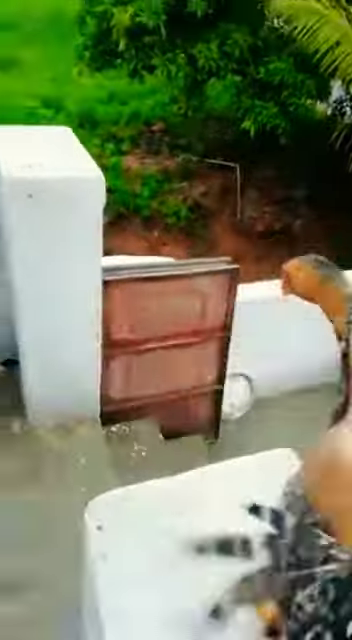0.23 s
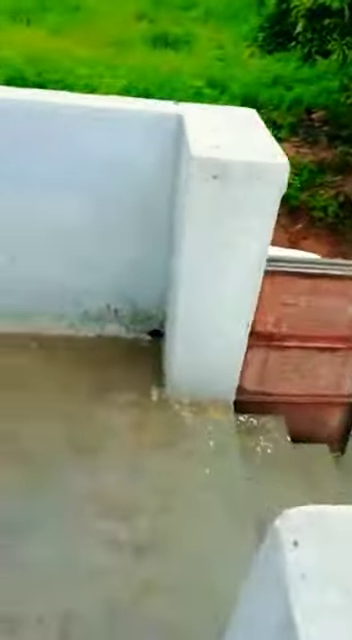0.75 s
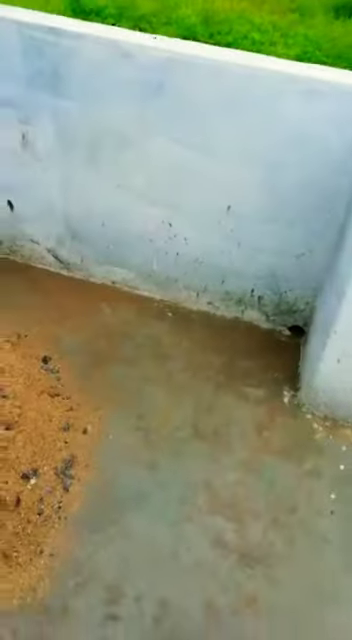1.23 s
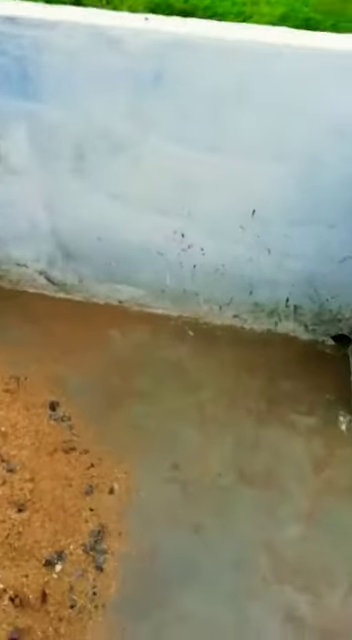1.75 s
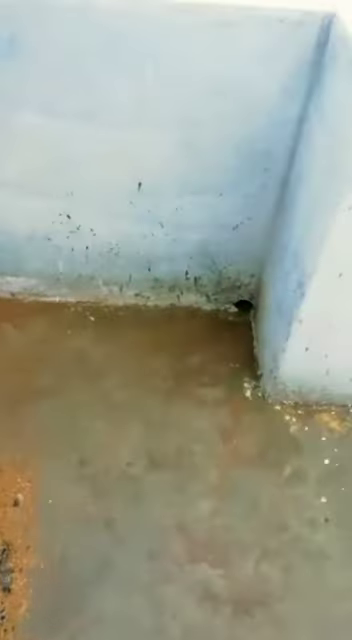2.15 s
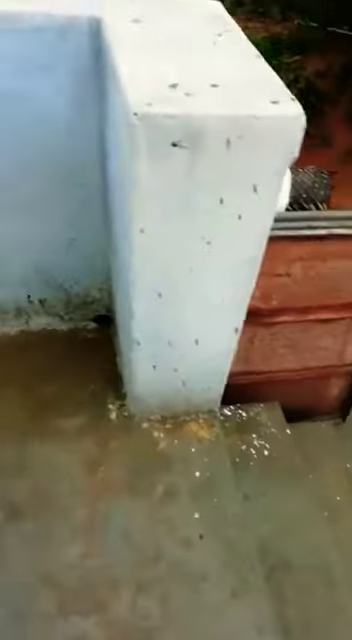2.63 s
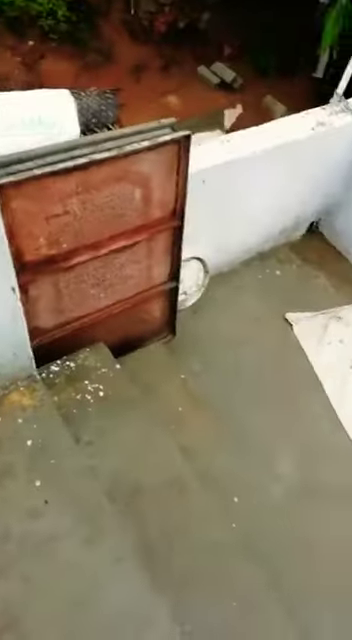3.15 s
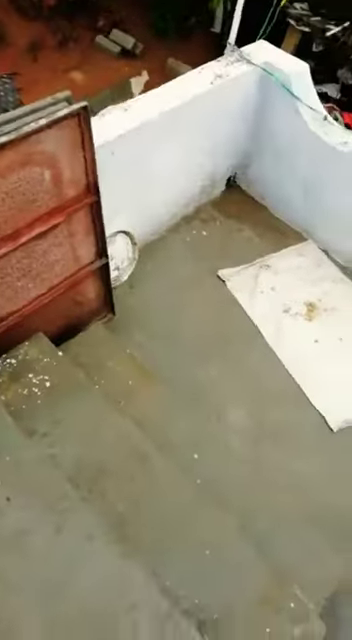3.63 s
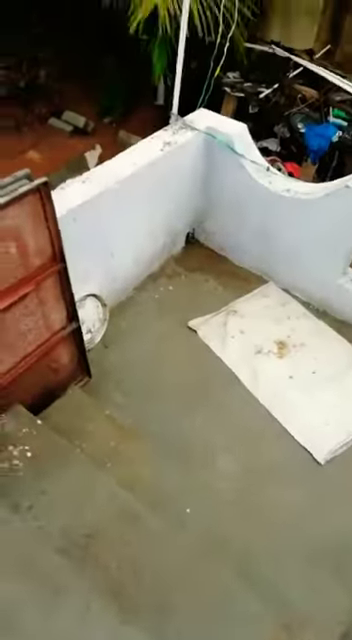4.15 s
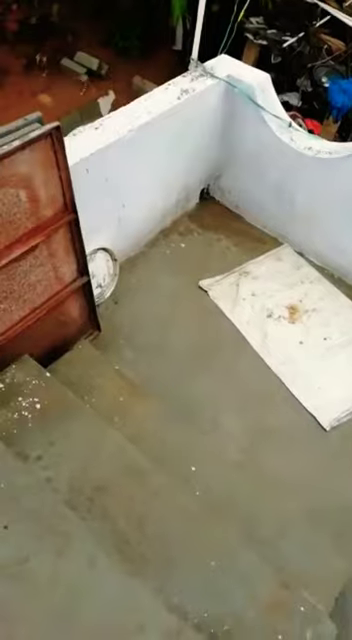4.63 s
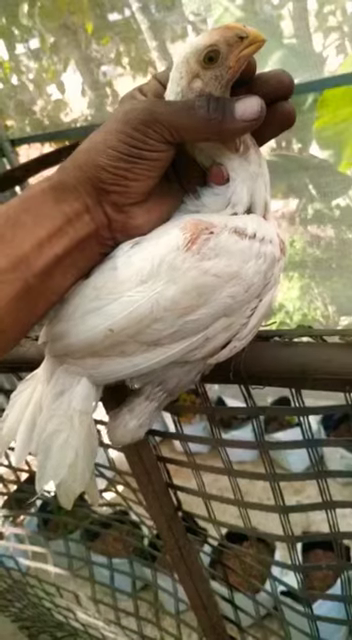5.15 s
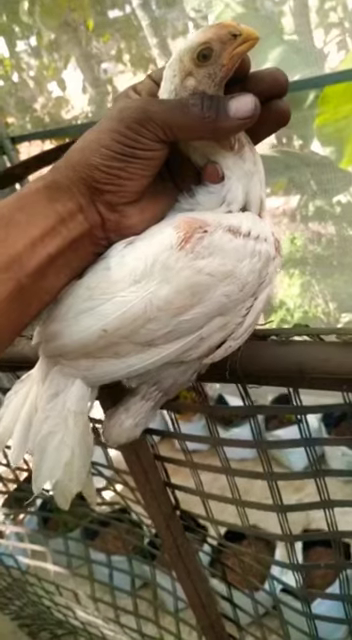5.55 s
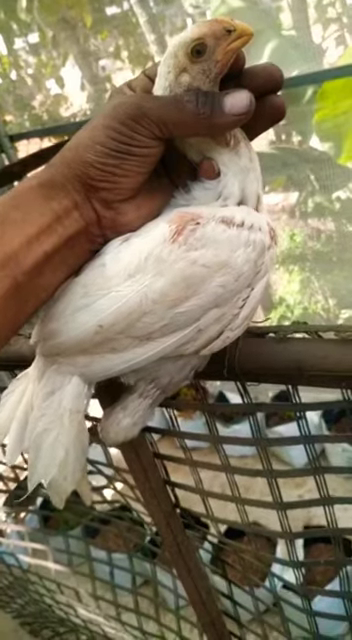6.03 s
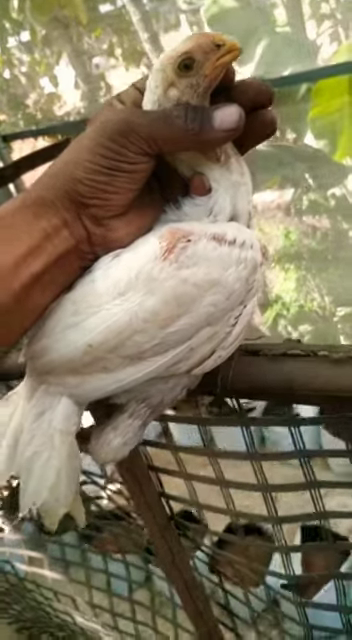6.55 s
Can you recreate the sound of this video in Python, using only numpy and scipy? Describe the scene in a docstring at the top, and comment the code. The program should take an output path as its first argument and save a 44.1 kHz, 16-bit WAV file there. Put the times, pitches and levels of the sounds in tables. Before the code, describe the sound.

Close to the microphone, a young hen gives short, rasping squawks that flutter rapidly between a low voice and a thin high one, with wing rustles and soft air thumps. The calls grow longer and harsher, then thin to single clucks on a quiet walled terrace. A sudden cut brings a low-humming coop, a light wire knock, faint far birds and three whistled chick peeps.

```python
"""Hen on a terrace, chick in a coop

A young hen squawks on a walled terrace: her voice flips about 48 times a second between a low register and a
thin high one, rasps at the breaks and ends in single clucks. Registers are gliding partials, rasp is irregular
clicks plus a lurching tone; feathers, air puffs and backgrounds are coloured noise, far birds are gliding tones.
After a short silence comes a coop: a low hum of wavering tones, a knock, far birds, three whistled chick peeps."""
import sys
import numpy as np
from scipy import signal
from scipy.fft import rfft, irfft, next_fast_len
from scipy.io import wavfile
from scipy.ndimage import uniform_filter1d, minimum_filter1d

SR = 44100
rng = np.random.default_rng(int(sys.argv[2]) if len(sys.argv) > 2 else 0)


def transcribe(u):
    """Save the signal u as a 16-bit wav file named by the first command-line argument.

    u: samples, shape (n,) or (channels, n), limited to [-1, 1]; the rate is SR.
    q: integer samples, one column per channel.
    """
    v = np.clip(np.atleast_2d(u).T, -1, 1)
    q = np.round(v * 32767).astype(np.int16)
    wavfile.write(sys.argv[1], SR, q)


N = 299439
TIME_S = np.arange(N) / SR
TERRACE_END_S, COOP_START_S, KNOCK_S = 4.72, 4.735, 4.895
CUTOFF_HZ = 15800

# Hen position: (time [s], left-right level [dB], lead of left port [ms])
HEN_PLACE = [(0, 4.5, 0.076), (.42, -0.5, 0.11), (1.0, 0.5, 0.061), (1.26, 0, 0.082), (1.95, 1, -0.028),
             (2.33, 2.5, -0.12), (2.62, -0.5, -0.19), (2.9, 1, -.12), (3.15, 0.5, -0.044),
             (3.43, -1, -0.043), (3.65, -2, -0.067), (4.3, 2, -0.07)]
# Port difference, left over right: (frequency [Hz], level [dB])
PORT_DIFFERENCE = [(200, -1), (750, -15.5), (1400, -1), (2000, -5.5), (2600, -1), (3300, -8), (4300, -14),
                   (5300, -13.5), (6600, -23), (8000, -18.5), (10000, -8.5), (12000, 4.5), (15000, 4)]
# Throat and beak resonances: (frequency [Hz], level [dB])
THROAT_COLOUR = [(3000, -6.5), (3800, 4.5), (4550, -13.5), (5300, 2), (6300, -1), (7300, -7), (8000, -13),
                 (9000, -22), (10200, -6.5), (11500, -21), (13000, -21.5), (16000, -35)]
# Rasp spectrum: (frequency [Hz], level [dB])
RASP_COLOUR = [(250, -26.5), (420, -17), (600, -20), (800, -12), (950, -17.5), (1250, -7), (1800, 3),
               (2200, -1), (2650, -3), (3200, -13), (3900, -3), (4500, -29.5), (5500, -40)]
# Deep cluck spectrum: (frequency [Hz], level [dB])
CHEST_COLOUR = [(280, -8.5), (450, -18), (700, -2.5), (950, 4.5), (1350, 2.5), (1800, -17.5), (2250, -9),
                (3000, -31)]
# Feather spectrum: (frequency [Hz], level [dB])
FEATHER_COLOUR = [(500, -17.5), (1500, -8), (3000, 3.5), (4500, -2.5), (6300, 7.5), (8000, -8.5),
                  (10000, -9.5), (15000, -8)]
# Puff spectrum: (frequency [Hz], level [dB])
PUFF_COLOUR = [(12, -33), (20, 0.5), (35, 2.5), (58, -6.5), (108, -20), (173, -22), (500, -28.5),
               (650, -60.5), (1100, -120)]
# Terrace air, spectrum shape: (frequency [Hz], level [dB])
TERRACE_COLOUR = [(15, -50), (25, -1), (108, -6.5), (309, -15), (503, -27), (796, -23), (988, -25.5),
                  (1560, -23), (1700, -27), (3920, -28.5), (4490, -33), (5730, -20), (7920, -35),
                  (14800, -30), (16000, -47)]
# Narrow hiss on the terrace, spectrum shape: (frequency [Hz], level [dB])
HISS_COLOUR = [(4600, -34), (5400, 1), (5700, -1), (6200, -10.5), (6800, -1), (7600, -34)]
# Coop air, spectrum shape: (frequency [Hz], level [dB])
COOP_COLOUR = [(15, -30), (25, -1), (97, -4), (229, -13.5), (285, -11.5), (775, -20), (1290, -19),
               (2050, -25), (2550, -26.5), (3250, -30), (4490, -31), (5730, -35.5), (9840, -39),
               (14400, -46), (16000, -63)]
# Noise correlation between ears, negatives read as 0: (frequency [Hz], correlation [-1..1])
EAR_LIKENESS = [(60, 0.98), (180, 0.98), (550, 0.74), (1650, -0.2), (4970, -1.4), (15000, -0.05)]
# Knock on wire mesh, spectrum shapes: (frequency [Hz], level [dB])
CLICK_COLOUR = [(200, -2), (750, 14.5), (1300, -4), (2500, 1), (3800, 7), (5500, -4), (9000, -15), (15000, -21)]
THUMP_COLOUR = [(15, -18), (70, 7), (200, 2.5), (700, -44)]
# Trills; levels before register and rasp trims: (first low note [s], last low note [s], low pitch [Hz],
# closing pitch [Hz], high pitch [Hz], opening level [dB], closing level [dB], octave [dB], overtones [dB],
# high register [dB], rasp [dB], treble rasp [dB])
TRILLS = [(0.013, .036, 1381, 1486, 3296, -16, -21.5, -34, -53, -23, -32, -52.5),
          (0.203, 0.24, 1761, 1412, 3140, -21.5, -14, -22, -39, -30.5, -25.5, -42),
          (0.394, 0.429, 1753, 1407, 3185, -19, -14, -28.5, -39, -27, -24.5, -29.5),
          (.945, 0.981, 1686, 1431, 3346, -19, -14.5, -32.5, -43, -32, -30, -39.5),
          (1.028, 1.067, 1640, 1392, 3240, -21, -16, -29, -32, -29, -27, -29.5),
          (1.251, 1.27, 1774, 1630, 3133, -15, -14.5, -30.5, -40, -21.5, -23.5, -46),
          (1.84, 1.853, 1564, 1492, 3020, -29, -23.5, -29, -44.5, -38, -30, -57),
          (1.92, 2.002, 1511, 1435, 3053, -16, -17.5, -29.5, -27.5, -27.5, -28, -31.5),
          (2.341, 2.364, 1550, 1644, 3062, -21, -17.5, -29, -26.5, -17, -26, -41),
          (2.563, 2.666, 1893, 1502, 3254, -19.5, -11, -16.5, -30, -22.5, -18.5, -19),
          (2.853, 2.976, 1836, 1426, 3150, -19.5, -11, -23, -18.5, -15, -17, -23),
          (3.136, 3.192, 1750, 1311, 3070, -18, -15, -27.5, -24.5, -22.5, -18, -20)]
# Low notes listed one by one, short and long; levels before trims: (centre [s], length [s], start [Hz],
# end [Hz], arch [share], level [dB], octave [dB], overtones [dB], rasp [dB], treble rasp [dB])
SINGLE_LOW_NOTES = [(0.257, 0.014, 1498, 1116, .02, -21, -44, -35.5, -28.5, -60),
                    (0.641, .016, 1458, 1147, .02, -25.5, -59, -52.5, -30.5, -38),
                    (1.002, 0.0097, 1470, 1420, .02, -30, -38.5, -49, -40.5, -41),
                    (1.876, 0.018, 1705, 1960, -0.048, -18.5, -29, -33, -22, -20),
                    (1.899, 0.019, 1766, 1510, 0.028, -16, -32.5, -32, -26, -24),
                    (2.022, 0.012, 1610, 1890, 0.06, -25, -41, -42, -28.5, -37.5),
                    (2.067, .01, 1845, 2025, .02, -17, -21, -25.5, -24, -21.5),
                    (2.095, .034, 1935, 1713, .1, -14.5, -25.5, -25, -28, -25.5),
                    (2.118, .022, 1708, 1274, .02, -17, -38, -30.5, -33.5, -37),
                    (2.305, .044, 1980, 1702, -0.17, -15.5, -25.5, -30, -16.5, -15.5),
                    (2.395, 0.041, 1815, 1673, .35, -12.5, -23, -25, -17.5, -15),
                    (3.416, 0.0051, 1500, 1700, -0.034, -15, -34, -35.5, -26, -39),
                    (3.438, 0.011, 1382, 1264, -0.03, -12.5, -29, -27, -34, -36.5),
                    (3.647, .022, 1452, 1173, .02, -15.5, -32.5, -39.5, -27, -32.5),
                    (4.263, 0.0087, 1657, 1384, 0.068, -28.5, -55, -63, -31, -54),
                    (4.283, 0.013, 1208, 1086, .02, -23.5, -34.5, -71.5, -46, -51.5),
                    (4.446, 0.02, 2202, 1867, .02, -36, -65, -65, -48, -72.5)]
# High notes listed one by one, short flicks and longer squeals; before trims: (centre [s], length [s],
# start [Hz], end [Hz], level [dB], overtones re level [dB])
SINGLE_HIGH_NOTES = [(.93, 0.024, 3625, 3310, -33, 1), (1.003, 0.023, 3070, 3190, -32.5, 5.5),
                     (2.03, 0.027, 3034, 3350, -27.5, 1.5), (2.052, .015, 3280, 3395, -18, -4),
                     (2.274, 0.01, 3120, 3140, -21.5, -6), (3.119, 0.026, 3090, 3100, -17.5, 0),
                     (3.426, 0.0089, 2986, 2962, -20, -5.5)]
# Clucks at about a third of the low register: (centre [s], length [s], start [Hz], end [Hz], level [dB])
DEEP_CLUCKS = [(0.261, 0.017, 482, 323, -25), (.638, .015, 454.4, 449, -26.5), (0.648, .013, 425, 330, -29)]
# Wing shifts: (time [s], level before trim [dB], fading [dB/s])
RUSTLES = [(0.021, -39, 66), (.19, -35.5, 84.5), (.29, -34.5, 104), (0.399, -33.5, 220), (0.919, -38.5, 40),
           (1.25, -35, 96.5), (1.498, -37, 98.5), (1.95, -45, 33.5), (2.158, -36.5, 154),
           (2.45, -56.5, 16.5), (3.51, -45, 51.5)]
# Far birds, terrace; levels before the direct and reflected mix:
# (start [s], end [s], start [Hz], end [Hz], level [dB])
TERRACE_CALLS = [(.065, .105, 3150, 2530, -41.5), (.1, .175, 2460, 2284, -48), (4.0, 4.1, 780, 825, -68),
                 (4.215, 4.275, 930, 910, -53.5), (4.615, 4.66, 4770, 3300, -62.5),
                 (4.66, 4.72, 2205, 2136, -61), (4.615, 4.73, 644, 608, -51.5)]
# Far birds, coop; same columns: (start [s], end [s], start [Hz], end [Hz], level [dB])
COOP_CALLS = [(5.29, 5.34, 2290, 2410, -58), (5.5, 5.545, 2470, 2540, -58), (5.68, 5.76, 2440, 2590, -55.5)]
# Air puffs on the microphone, before low-pass: (centre [s], length [s], level [dB])
PUFFS = [(0.161, 0.058, -32.5), (0.264, 0.082, -26), (.34, 0.028, -26), (.374, 0.031, -22.5),
         (.44, 0.12, -41.5), (1.179, 0.081, -33.5), (1.277, 0.091, -41)]
# Quill flicks: (time [s], level [dB])
FLICKS = [(0.175, -27.5), (.283, -24.5), (.886, -44.5), (1.764, -43.5), (2.18, -46)]
# Hum tones: (frequency [Hz], level before trim [dB])
HUM = [(91.5, -47.5), (204.6, -57.5), (285.3, -67)]
# Chick, one list a peep; levels before panning: (time [s], pitch [Hz], level [dB])
PEEPS = [
    [(5.91, 2960, -57), (5.935, 2330, -50), (5.95, 2120, -42.5), (5.963, 2480, -51), (5.97, 3510, -40),
     (5.979, 3930, -48), (5.99, 3080, -60)],
    [(6.052, 2600, -58), (6.063, 3245, -40), (6.085, 3175, -39), (6.103, 3540, -38.5), (6.116, 4260, -50),
     (6.129, 2980, -48)],
    [(6.208, 3100, -58), (6.22, 3680, -37.5), (6.24, 3690, -33.5), (6.268, 3560, -35), (6.282, 2830, -59)],
]

FLIP_S = .021  # between low notes
LOW_S, CLOSING_S, HIGH_S = .009, .012, .010  # note lengths in trills
# As the breath runs out the upper partials fade
CLOSING_DULL_DB, HIGH_FADE_DB, HIGH_OVERTONES_DB = -3, -4, 1
# The pitch sinks around a point shortly before the closing note
SAG_S, SAG_LEAD_S = .009, .005
DROOP, FLIP_SCATTER = .02, .025  # shares of pitch: offset at each note end, random stray of each low-note end
TREMBLE_FULL_S = .03  # shorter notes tremble less
RASP_LEAD_S, RASP_TAIL_S, RASP_ATTACK_S = 0.019, 0.0085, .014
RASP_ONSET_DB, RASP_CLOSE_DB, TREBLE_CLOSE_DB = -10.5, -4, -15  # re top of the rasp
RUSTLE_RISE_DB_PER_S, STIR_DB = 256, -67.5  # swell rate; faint stir between rustles, before trim
FAR_ARCH, FAR_EDGE_DB = 0.012, -6  # far calls: pitch share added in the middle, level at both ends


def from_db(db):
    """Decibels to amplitude."""
    return 10 ** (np.asarray(db) / 20)


def rms_one(x):
    """Scale to rms 1."""
    return x / np.sqrt(np.mean(x ** 2) + 1e-20)


def at_hz(points, hz):
    """Read a spectrum on a log-frequency axis."""
    f, value = np.transpose(points)
    return np.interp(np.log(np.maximum(hz, 1)), np.log(f), value)


def colour(x, spectrum):
    """Filter by a (frequency [Hz], level [dB]) spectrum."""
    size = next_fast_len(N + 4096)
    hz = np.arange(size // 2 + 1) * SR / size
    return irfft(rfft(x, size) * from_db(at_hz(spectrum, hz)), size)[..., :N]


def drift(rate_hz, size=N):
    """Random wander about 0: straight lines between independent knots, spread about 1.2."""
    knots = rng.standard_normal(int(size / SR * rate_hz) + 3)
    return 1.5 * np.interp(np.arange(size) / SR * rate_hz, np.arange(len(knots)), knots)


def gate(t_s, start_s, end_s, edge_s):
    """1 between start and end, with rounded edges."""
    ramp = np.minimum(t_s - start_s, end_s - t_s) / edge_s + .5
    return np.sin(np.pi / 2 * np.clip(ramp, 0, 1)) ** 2


def stereo_noise(spectrum):
    """Coloured noise, alike in both ears in the bass; rms 1."""
    likeness = [(f, np.clip(c, 0, .99)) for f, c in EAR_LIKENESS]
    mid = colour(rng.standard_normal(N), [(f, 10 * np.log10(1 + c)) for f, c in likeness])
    side = colour(rng.standard_normal(N), [(f, 10 * np.log10(1 - c)) for f, c in likeness])
    return rms_one(colour(mid + side * np.array([[1], [-1]]), spectrum))


def reflections(x, early_db, early_t60_s, late_db, late_t60_s, dull_hz):
    """Convolve with sparse random echoes: a quick early decay plus a slower tail, low-passed."""
    t_s = np.arange(SR) / SR
    sparse = rng.standard_normal((2, SR)) * (rng.random((2, SR)) < .1) * (t_s > .0015)
    response = 0
    for db, t60_s in ((early_db, early_t60_s), (late_db, late_t60_s)):
        response = response + from_db(db) * rms_one(sparse * from_db(-60 * t_s / t60_s)) / np.sqrt(SR)
    response = signal.sosfilt(signal.butter(1, dull_hz, fs=SR, output="sos"), response)
    return signal.fftconvolve(x, response, axes=1)[:, :N]


def whistle(rows, octave_db, jitter):
    """A nearly pure gliding tone with an octave partial."""
    s, hz, db = np.transpose(rows)
    pitch_hz = np.interp(TIME_S, s, hz) * (1 + jitter * drift(700))
    phase = 2 * np.pi * np.cumsum(pitch_hz) / SR
    tone = np.sqrt(2) * (np.sin(phase) + from_db(octave_db) * np.sin(2 * phase))
    return from_db(np.interp(TIME_S, s, db)) * gate(TIME_S, s[0], s[-1], edge_s=.006) * tone


def note(centre_s, length_s, start_hz, end_hz, arch, jitter, edge_s, scoop, swell_db):
    """Sample indices, pitch, phase and envelope of an unsteady glide with a scooped onset."""
    start_s, end_s = centre_s - length_s / 2, centre_s + length_s / 2
    at = np.arange(max(int((start_s - edge_s) * SR), 0), int((end_s + edge_s) * SR))
    u = np.clip((TIME_S[at] - centre_s) / length_s, -.7, .7)
    slide = scoop * np.clip((start_s - TIME_S[at]) / edge_s + .5, 0, 1) ** 2
    bend = 1 + slide + arch * (1 / 12 - u * u) + jitter * drift(1300, len(at))
    hz = (start_hz + (end_hz - start_hz) * (u + .5)) * bend
    phase = 2 * np.pi * (np.cumsum(hz) / SR + rng.random())
    envelope = gate(TIME_S[at], start_s, end_s, edge_s) * from_db(swell_db * (1 / 3 - 4 * u * u))
    return at, hz, phase, envelope


def overtones(hz, phase, multiples, flutter_db=3, scatter_rad=0.31):
    """Harmonics swell as they glide through throat resonances, each trembling on its own; rms 1."""
    size, total = len(hz), 0
    for k in multiples:
        gain = from_db(at_hz(THROAT_COLOUR, k * hz) + flutter_db * drift(400, size)) * (k * hz < CUTOFF_HZ)
        total = total + gain * np.sin(k * phase + rng.uniform(0, 2 * np.pi) + scatter_rad * drift(600, size))
    return rms_one(total)


def terrace_air(air_db=-59.5, hiss_db=-64):
    """Steady broadband air and a narrow hiss, both coloured noise."""
    return from_db(air_db) * stereo_noise(TERRACE_COLOUR) + from_db(hiss_db) * stereo_noise(HISS_COLOUR)


def hen():
    """All registers and the rasp come from one throat, then reach the ports and reflect."""
    high, high_clear = high_register()
    low, low_clear = low_register()
    voice = ports(low + high + deep_clucks() + rasp(np.maximum(low_clear, high_clear)))
    return voice + reflections(voice, early_db=-8, early_t60_s=0.065, late_db=-22.5, late_t60_s=0.45, dull_hz=4400)


def ports(x):
    """Two microphone ports hear the hen with different colour, level and delay."""
    s, pan_db, lead_ms = np.transpose(HEN_PLACE)
    pan_db, lead_s = np.interp(TIME_S, s, pan_db), np.interp(TIME_S, s, lead_ms) / 1000
    ears = []
    for side in (1, -1):  # left, right
        heard = colour(x, [(f, 10 * np.log10(2 / (1 + from_db(-2 * side * db)))) for f, db in PORT_DIFFERENCE])
        gain = np.sqrt(2 / (1 + from_db(-2 * side * pan_db)))
        ears.append(np.interp(TIME_S + side * lead_s / 2, TIME_S, heard) * gain)
    return np.array(ears)


def rasp_spans():
    """Rasp begins before the low notes and outlasts them: (start [s], end [s], level [dB], treble [dB])."""
    spans = [(first - RASP_LEAD_S, last + RASP_TAIL_S, db, treble_db)
             for first, last, *_, db, treble_db in TRILLS]
    for s, length, *_, db, treble_db in SINGLE_LOW_NOTES:
        spans.append((s - length / 2 - RASP_ATTACK_S / 2, s + length / 2 + RASP_TAIL_S / 2, db, treble_db))
    return spans


def rasp(clear, body_trim_db=4, treble_trim_db=1.0, body_duck_db=-8, treble_duck_db=-6,
         slap_hz=1000, disorder=0.21, flutter_db=1.5, squeal_hz=2200, wander=0.24):
    """Between registers the pitch lurches and the membranes slap irregularly; a clear note pushes this back."""
    body, treble = np.zeros(N), np.zeros(N)
    for start, end, db, treble_db in rasp_spans():
        at = np.flatnonzero((TIME_S > start - .01) & (TIME_S < end + .01))
        s = np.sort([start, start + RASP_ATTACK_S, (start + end) / 2, end])
        sounding = gate(TIME_S[at], start, end, edge_s=.011)
        body[at] += sounding * from_db(db + np.interp(TIME_S[at], s, [RASP_ONSET_DB, 0, 0, RASP_CLOSE_DB]))
        treble_shape_db = np.interp(TIME_S[at], s, [RASP_ONSET_DB, 0, 0, TREBLE_CLOSE_DB])
        treble[at] += sounding * from_db(treble_db + treble_shape_db)
    # One click per uneven membrane cycle, plus a little hiss
    cycles = np.cumsum(slap_hz * np.exp(disorder * drift(1500))) / SR
    clicks = np.diff(np.floor(cycles), prepend=0) * from_db(flutter_db * drift(300))
    slaps = clicks + 0.073 * rng.standard_normal(N)
    lurching_hz = squeal_hz * np.exp(wander * drift(450) + .07 * drift(2500))
    squeal = np.sin(2 * np.pi * np.cumsum(lurching_hz) / SR)
    harsh = rms_one(colour(squeal, RASP_COLOUR)) + 0.7 * rms_one(colour(slaps, RASP_COLOUR))
    high_pass = signal.butter(4, 4400, "high", fs=SR, output="sos")
    bright = signal.sosfilt(high_pass, colour(slaps, THROAT_COLOUR))
    return (body * from_db(body_trim_db + body_duck_db * clear) * rms_one(harsh)
            + treble * from_db(treble_trim_db + treble_duck_db * clear) * rms_one(bright))


def flips(first_s, last_s):
    """Evenly spaced low notes of a trill: (time [s], progress [0..1])."""
    progress = np.linspace(0, 1, max(int(round((last_s - first_s) / FLIP_S)), 1) + 1)
    return zip(first_s + (last_s - first_s) * progress, progress)


def high_notes():
    """Half a flip before each low note of a trill comes a high one, ever weaker; listed high notes are added."""
    notes = list(SINGLE_HIGH_NOTES)
    for first, last, _, _, hz, *_, db, _, treble_db in TRILLS:
        top_db = HIGH_OVERTONES_DB + min(treble_db - db, 0) / 2
        for s, progress in flips(first, last):
            notes.append((s - FLIP_S / 2, HIGH_S, hz * (1 + DROOP), hz * (1 - DROOP),
                          db + HIGH_FADE_DB * progress, top_db))
    return notes


def high_register(trim_db=1.0, third_db=-23, two_thirds_db=-10, overtone_trim_db=0.5, octave=1.8):
    """The voice breaks upward; the swing repeats every third cycle, so partials fall at thirds of the pitch."""
    out, clear = np.zeros(N), np.zeros(N)
    for s, length, start_hz, end_hz, db, top_db in high_notes():
        at, hz, phase, envelope = note(s, length, start_hz, end_hz, arch=.22, jitter=0.01, edge_s=.005,
                                       scoop=-.1, swell_db=-0.5)
        loose = phase / 3 + .4 * drift(500, len(at))
        thirds = from_db(third_db) * np.sin(loose) + from_db(two_thirds_db) * np.sin(2 * loose)
        tone = np.sqrt(2) * (np.sin(phase) + thirds)
        upper = overtones(hz / 3, phase / 3, np.arange(4, 16), flutter_db=4, scatter_rad=.5)
        upper = rms_one(upper + octave * np.cos(2 * phase))
        out[at] += from_db(db + trim_db) * envelope * (tone + from_db(top_db + overtone_trim_db) * upper)
        clear[at] = np.clip(envelope, clear[at], 1)
    return out, clear


def low_notes():
    """A trill moves in level to its longer, duller closing note while the pitch sags; listed notes are added."""
    notes, ends = [row[:8] for row in SINGLE_LOW_NOTES], np.array([-1, 1])
    for first, last, hz, closing_hz, _, opening_db, closing_db, octave_db, top_db, *_ in TRILLS:
        for s, progress in flips(first, last):
            length, dull_db = (CLOSING_S, CLOSING_DULL_DB) if progress == 1 else (LOW_S, 0)
            sunk = 1 + np.tanh((s + ends * length / 2 - last + SAG_LEAD_S) / SAG_S)
            sunk = sunk / (1 + np.tanh(SAG_LEAD_S / SAG_S))
            stray = 1 - DROOP * ends + FLIP_SCATTER * rng.standard_normal(2)
            pitch_hz = (hz + (closing_hz - hz) * sunk) * stray
            db = opening_db + (closing_db - opening_db) * progress
            notes.append((s, length, *pitch_hz, 0, db, octave_db + dull_db, top_db + dull_db))
    return notes


def low_register(trim_db=1.0, tremble_db=3.0):
    """The syrinx swings freely: a strong, trembling fundamental with harmonics. Also returns voice clarity."""
    out, clear = np.zeros(N), np.zeros(N)
    for s, length, start_hz, end_hz, arch, db, octave_db, top_db in low_notes():
        at, hz, phase, envelope = note(s, length, start_hz, end_hz, arch=arch, jitter=0.015, edge_s=.004,
                                       scoop=.28, swell_db=4.0)
        tone = np.sqrt(2) * (from_db(db) * np.sin(phase) + from_db(octave_db) * np.sin(2 * phase))
        tone += from_db(top_db) * overtones(hz, phase, np.arange(3, 11))
        tremble = tremble_db * min(length / TREMBLE_FULL_S, 1) * drift(220, len(at))
        out[at] += from_db(trim_db + tremble) * envelope * tone
        clear[at] = np.clip(envelope, clear[at], 1)
    return out, clear


def feathers(trim_db=-2, grain_db=3):
    """Feathers brush over each other in grainy noise swishes that swell and fade."""
    swishes_db = [db - np.maximum(RUSTLE_RISE_DB_PER_S * (s - TIME_S), fade * (TIME_S - s))
                  for s, db, fade in RUSTLES]
    level_db = trim_db + np.maximum(np.max(swishes_db, axis=0), STIR_DB) + grain_db * drift(350)
    return from_db(level_db) * stereo_noise(FEATHER_COLOUR)


def far_birds(calls, octave_db, flutter_db):
    """Far calls, each a wavering arched glide, arrive mostly as blurred reflections."""
    sound = 0
    for start, end, start_hz, end_hz, db in calls:
        middle = ((start + end) / 2, (start_hz + end_hz) / 2 * (1 + FAR_ARCH), db)
        arch = [(start, start_hz, db + FAR_EDGE_DB), middle, (end, end_hz, db + FAR_EDGE_DB)]
        sound = sound + whistle(arch, octave_db, jitter=0.03)
    sound = sound * rms_one(from_db(flutter_db * drift(350))) * np.ones((2, 1))
    return 0.6 * sound + reflections(sound, early_db=3, early_t60_s=.09, late_db=-12.5, late_t60_s=.5, dull_hz=4000)


def puffs():
    """Moving air thumps on the microphone: gated low noise."""
    push = sum(from_db(db) * gate(TIME_S, s - length / 2, s + length / 2, length / 2) for s, length, db in PUFFS)
    return push * signal.sosfilt(signal.butter(2, 300, fs=SR, output="sos"), stereo_noise(PUFF_COLOUR))


def flicks(t60_s=0.028):
    """Stiff quills snap past each other: short decaying noise."""
    snap = sum(from_db(db - 60 * np.clip(TIME_S - s, 0, 1) / t60_s) * (TIME_S > s) for s, db in FLICKS)
    return snap * stereo_noise(FEATHER_COLOUR)


def deep_clucks():
    """A hollow, falling stack of low harmonics."""
    out = np.zeros(N)
    for s, length, start_hz, end_hz, db in DEEP_CLUCKS:
        at, hz, phase, envelope = note(s, length, start_hz, end_hz, arch=0.042, jitter=0.03, edge_s=0.0095,
                                       scoop=0, swell_db=-1)
        stack = sum(from_db(at_hz(CHEST_COLOUR, k * hz)) * np.sin(k * phase) for k in range(1, 8))
        out[at] += from_db(db) * envelope * rms_one(stack)
    return out


def coop_air(air_db=-43.5, hum_trim_db=-2, whine_hz=4490, whine_db=-68, fade_s=0.19):
    """Noise rumble, wavering hum tones and a thin whine fade in."""
    hum = 0
    for hz, db in HUM:
        level = np.sqrt(2) * from_db(db + hum_trim_db + 2 * drift(6))
        hum = hum + level * np.sin(2 * np.pi * hz * TIME_S + 1.1 * drift(6.9))
    whine = from_db(whine_db + 2 * drift(35)) * np.sin(2 * np.pi * whine_hz * TIME_S + 0.73 * drift(130))
    air = from_db(air_db) * stereo_noise(COOP_COLOUR) + hum + whine
    return air * np.clip((TIME_S - COOP_START_S) / fade_s, 0, 1)


def knock(click_db=-41, click_t60_s=0.14, ring_hz=7700, ring_db=-56, ring_t60_s=0.3, thump_db=-51):
    """A light knock on wire mesh: a noise click, a thin ring and a soft thump."""
    age_s = np.maximum(TIME_S - KNOCK_S, 0)
    click = from_db(click_db - 60 * age_s / click_t60_s) * stereo_noise(CLICK_COLOUR)
    ring = from_db(ring_db - 60 * age_s / ring_t60_s) * np.sin(2 * np.pi * ring_hz * age_s + drift(150))
    push = gate(TIME_S, KNOCK_S - .03, KNOCK_S + 0.14, edge_s=0.041)
    return (TIME_S > KNOCK_S) * (click + ring) + from_db(thump_db) * push * stereo_noise(THUMP_COLOUR)


def chick():
    """Three gliding peeps, louder on the right, with reflections."""
    peeps = sum(whistle(peep, octave_db=-24, jitter=.009) for peep in PEEPS) * from_db([[-3], [2]])
    return peeps + reflections(peeps, early_db=2, early_t60_s=0.024, late_db=-12, late_t60_s=0.27, dull_hz=3500)


def scene():
    """The terrace, a short silence, the coop."""
    terrace = terrace_air() + hen() + feathers() + far_birds(TERRACE_CALLS, octave_db=-29, flutter_db=5)
    terrace = terrace + puffs() + flicks()
    coop = coop_air() + knock() + far_birds(COOP_CALLS, octave_db=-6, flutter_db=5) + chick()
    return terrace * gate(TIME_S, -1, TERRACE_END_S, edge_s=0.0031) + coop


def record(dry):
    """A quick limiter holds the loudest peaks under full scale; a steep low-pass cuts the top."""
    peak = np.abs(dry).max(axis=0)
    gain = minimum_filter1d(.92 / np.maximum(peak, .92), size=201)
    smooth_gain = uniform_filter1d(uniform_filter1d(gain, size=101), size=101)
    low_pass = signal.cheby2(20, 80, CUTOFF_HZ + 800, fs=SR, output="sos")
    return signal.sosfilt(low_pass, dry * smooth_gain)


dry = scene()
out = record(dry)
transcribe(out)
```